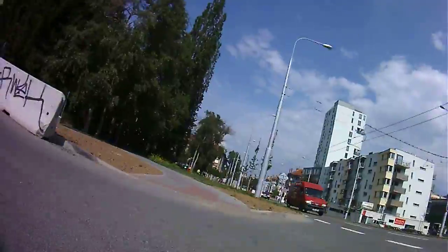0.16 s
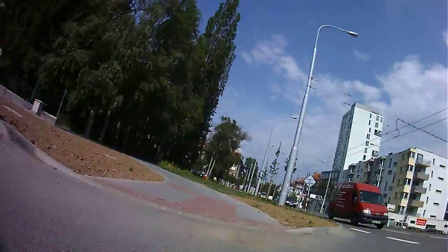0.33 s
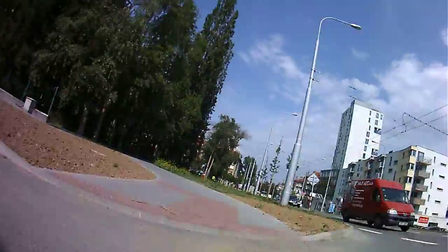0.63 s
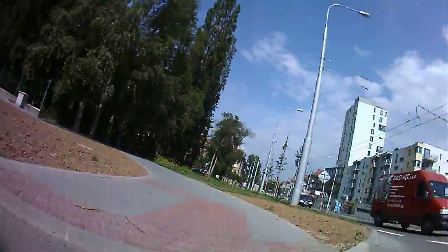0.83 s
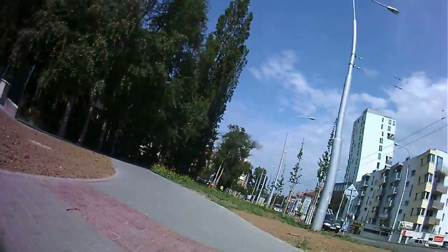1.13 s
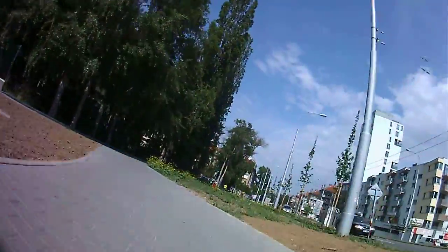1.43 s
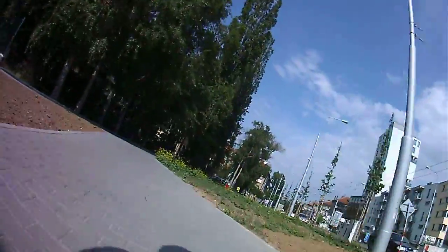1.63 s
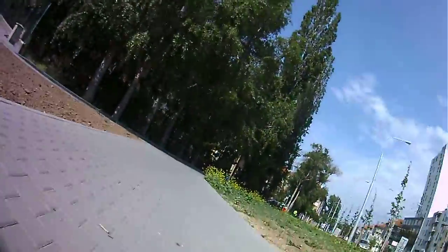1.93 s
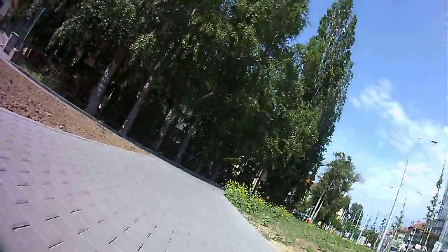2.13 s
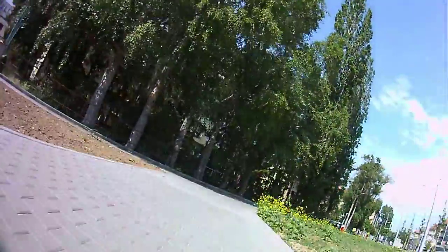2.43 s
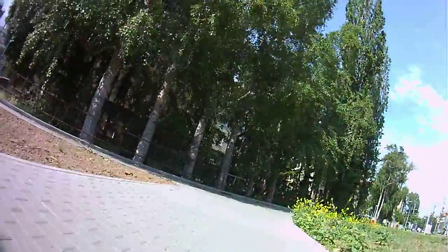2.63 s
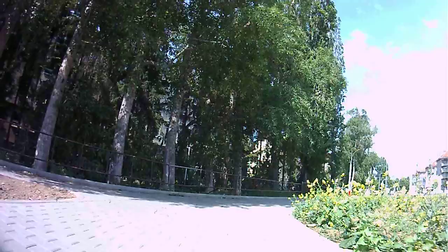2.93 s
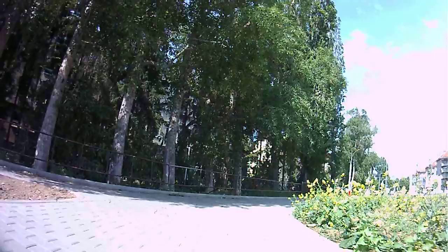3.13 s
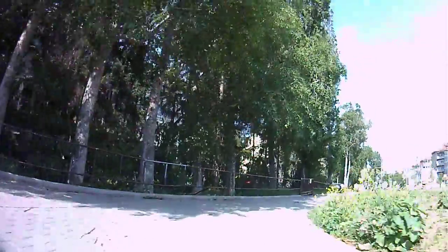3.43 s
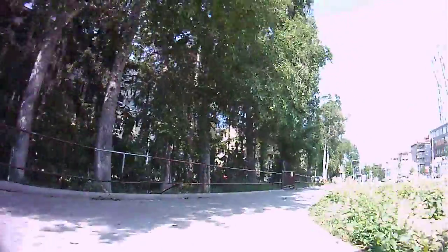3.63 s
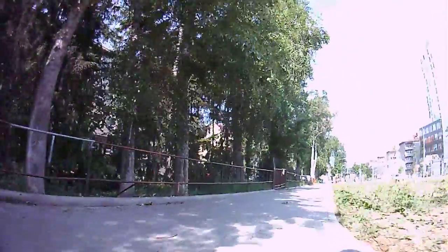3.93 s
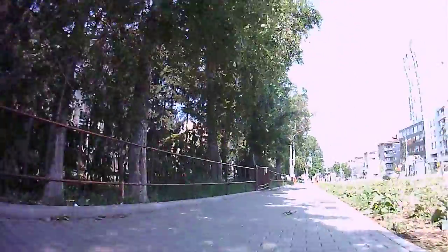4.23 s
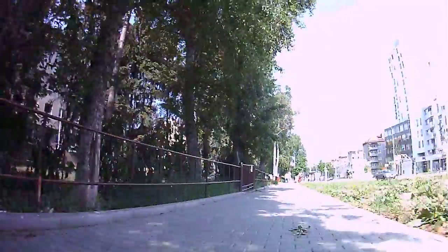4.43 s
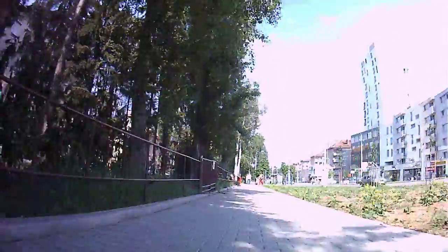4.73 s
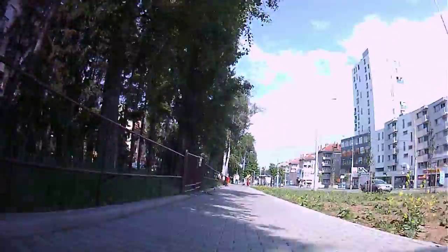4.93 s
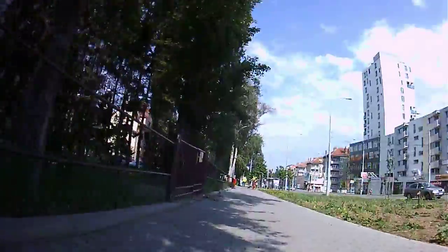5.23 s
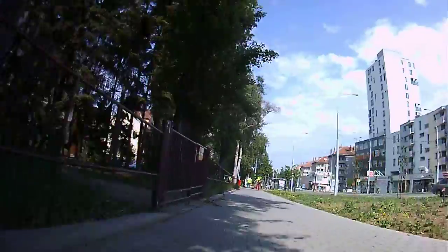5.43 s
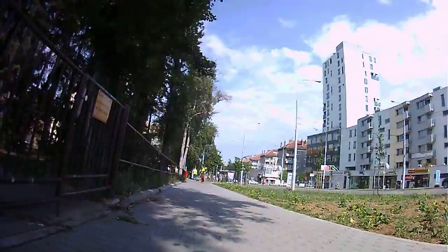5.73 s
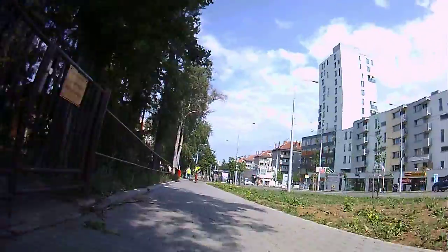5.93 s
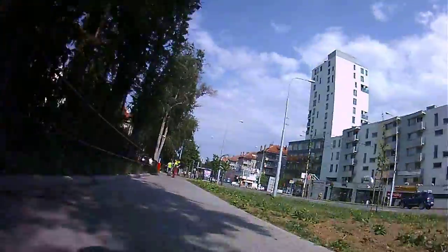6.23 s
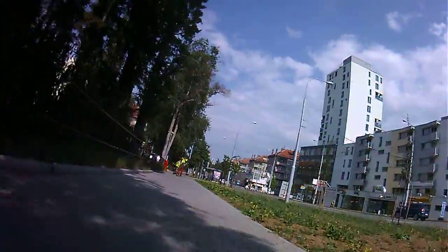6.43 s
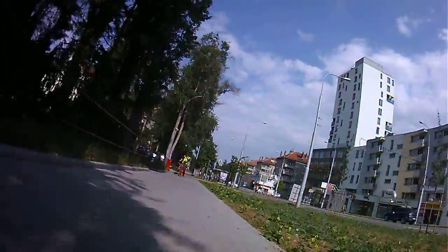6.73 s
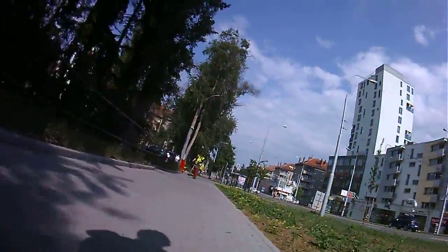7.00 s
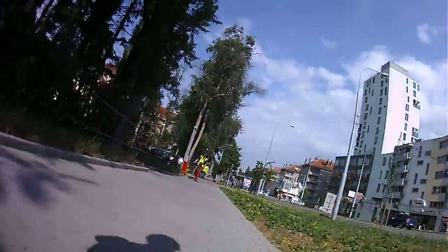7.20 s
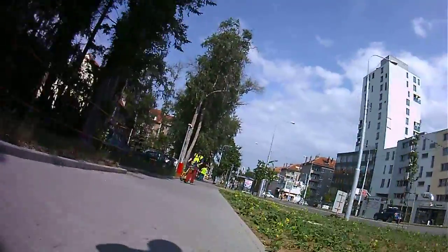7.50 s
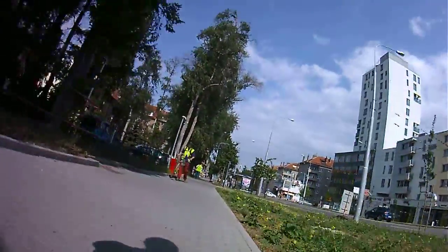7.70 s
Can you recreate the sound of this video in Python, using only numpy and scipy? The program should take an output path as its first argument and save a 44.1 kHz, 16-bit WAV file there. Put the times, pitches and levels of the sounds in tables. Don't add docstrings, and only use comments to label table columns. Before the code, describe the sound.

An electric skateboard rumbles fast over paving blocks, wheels buzzing and drumming, with violent overloaded slams near the start and rattling camera mount throughout.

```python
import sys
import numpy as np
from scipy import signal
from scipy.fft import rfft, irfft, next_fast_len
from scipy.io import wavfile
from scipy.ndimage import map_coordinates

SR = 44100
rng = np.random.default_rng(int(sys.argv[2]) if len(sys.argv) > 2 else 0)


def invert_db(x):
    u = np.asarray(x, float) / 20
    return 10 ** u


def wrap_up_sound(samples):
    columns = np.atleast_2d(samples).T
    tamed = np.clip(columns, -1, 1)
    steps = np.round(tamed * 32767).astype(np.int16)
    wavfile.write(sys.argv[1], SR, steps)


N = 346626


def along(points, hz):
    point_hz, db = np.transpose(points)
    return np.interp(np.log(hz + 1), np.log(point_hz + 1), db)


def curves(rows):
    s, *columns = np.transpose(rows)
    return [np.interp(np.arange(N) / SR, s, column) for column in columns]


def unit(x):
    return x / np.sqrt(np.mean(x ** 2) + 1e-20)


def wobble(rate):
    knots = rng.standard_normal(int(N * rate / SR) + 4)
    return map_coordinates(knots, [np.arange(N) * rate / SR])


def coloured(x, points):
    size = next_fast_len(N + 16384)
    gain = invert_db(along(points, np.fft.rfftfreq(size, 1 / SR)))
    cepstrum = irfft(np.log(gain + 1e-7), size)
    cepstrum[1:size // 2] *= 2
    cepstrum[size // 2 + 1:] = 0
    return irfft(rfft(x, size) * np.exp(rfft(cepstrum)), size)[:N]


def band_noise(hz, octaves, size):
    f = np.fft.rfftfreq(size, 1 / SR) + 1
    bell = np.exp(-(np.log2(f / hz) / octaves) ** 2)
    return unit(irfft(rfft(rng.standard_normal(size)) * bell, size))


def contacts(rows, ring, octaves, rise):
    out, t = np.zeros(N + SR), np.arange(4096) / SR
    for s, db, hz, t60 in rows:
        puff = band_noise(hz, octaves, size=len(t)) * invert_db(-45 * t / t60)
        wave = ring * np.sin(2 * np.pi * hz * t) + puff
        envelope = invert_db(db - 60 * t / t60) * (1 - np.exp(-t / rise))
        out[round(s * SR):][:len(t)] += envelope * wave
    return out[:N]


def ticks(rows, octaves):
    clicks = [(s, db - 1.5, hz, .025) for s, db, hz in rows]
    return contacts(clicks, ring=0.24, octaves=octaves, rise=0.0009)


# start in seconds, peak in dB, pitch in Hz.
GRIT_TICKS = [(0.2354, -54, 2300), (0.3087, -33.5, 2240), (0.5746, -31, 2250), (2.0675, -40, 2390),
              (2.4648, -44, 2380), (2.803, -31, 2180), (3.3653, -39, 3580), (3.5923, -39.5, 3370),
              (3.628, -36.5, 3460), (4.1235, -38.5, 3530), (4.1535, -33.5, 3400), (4.1729, -31.5, 3330),
              (4.2119, -42.5, 3650), (6.2567, -38, 2420), (6.674, -46, 3530), (6.8575, -41, 2920),
              (7.0624, -29, 2200), (7.5844, -37, 2280), (7.6036, -34, 3100), (7.817, -34, 2700)]


def grit_ticks():
    return ticks(GRIT_TICKS, octaves=0.26)


# start in seconds, peak in dB.
HINGE_RATTLES = [(0.434, -18.5), (0.599, -23), (0.6445, -17.5), (0.7272, -15.5), (0.791, -33.5),
                 (1.9358, -19), (1.9842, -26), (2.2396, -33), (2.2785, -22.5), (2.3314, -31), (2.7126, -22),
                 (2.8178, -23.5), (3.0044, -19), (3.0518, -24), (3.0822, -21), (4.3254, -26.5),
                 (4.4775, -18), (4.72, -33.5), (4.8272, -22.5), (4.8672, -25.5), (4.9415, -24),
                 (4.9824, -20.5), (5.39, -22), (5.4399, -26.5), (6.0051, -29), (6.4521, -25),
                 (6.9704, -20.5), (7.0377, -24.5), (7.5471, -22), (7.7421, -34)]
# start in seconds, peak in dB.
CLASP_RATTLES = [(0.0579, -31.5), (2.1385, -22), (2.3486, -25.5), (2.756, -21), (3.1171, -26),
                 (3.2099, -18), (3.3277, -23.5), (3.4145, -25.5), (3.955, -12), (4.0046, -28),
                 (4.0286, -14.5), (4.0779, -25.5), (4.4157, -18), (4.6945, -24), (4.8018, -22.5),
                 (5.0173, -20.5), (5.366, -31), (5.5623, -22), (5.9677, -28.5), (6.0157, -22.5),
                 (6.3523, -16.5), (6.3792, -16.5), (6.7838, -19.5), (6.9265, -18), (7.0707, -17),
                 (7.1041, -31.5), (7.1221, -21.5), (7.145, -26), (7.1694, -29), (7.1919, -19.5)]


def rattles():
    hinge_hz, clasp_hz, case_hz = 1204, 1600, 2263
    pitch_scatter = 0.024
    rings, case = [], []
    for rows, part_hz in ((HINGE_RATTLES, hinge_hz), (CLASP_RATTLES, clasp_hz)):
        for s, db in rows:
            part_detune, case_detune = np.exp(pitch_scatter * rng.standard_normal(2))
            rings.append((s, db, part_hz * part_detune, 0.026))
            case.append((s, db - 11.5, case_hz * case_detune))
    return contacts(rings, ring=1.0, octaves=.35, rise=0.0016) + ticks(case, octaves=.13)


# start in seconds,
# peak in dB, pitch in Hz.
WHEEL_KNOCKS = [(0.13, -18, 427), (0.426, -17, 411), (0.705, -16, 430), (1.034, -15, 410),
                (1.697, -10.5, 380), (2.139, -20, 345), (2.908, -26, 410), (3.65, -20, 420),
                (3.783, -14.5, 375), (4.319, -8, 410), (4.358, -18.5, 135), (4.43, -19.5, 132),
                (4.732, -14.5, 412), (4.938, -28, 393.2), (5.476, -10, 331), (5.613, -13.5, 142.2),
                (5.651, -8, 136.4), (6.171, -20.5, 567), (6.628, -23, 408), (7.035, -8.5, 431),
                (7.316, -27, 450), (7.36, -14, 450), (7.585, -14.5, 423), (7.672, -19, 524)]


def wheel_knocks():
    return contacts([(*row, .06) for row in WHEEL_KNOCKS], ring=1.0, octaves=0.94, rise=0.0025)


# start in seconds,
# peak in dB, thud against it in dB, bright edge against it in dB, length in seconds.
STRIKES = [(1.165, -3.5, 2.5, -11, 0.0029), (1.1679, -9, 10.5, -13, 0.0043),
           (1.282, -16, -5, -40, 0.0056), (1.2943, -17, 12.5, -23.5, 0.0064),
           (1.3045, -16.5, 15, -19.5, 0.0065), (1.312, -12.5, 17, -23, 0.0044),
           (1.3201, -1.5, 2.5, -11, 0.0035), (1.3264, 6, 0.5, -11, 0.0043),
           (1.338, -8.5, 6, -17, 0.0034), (1.346, -21, 13.5, -22, 0.0058),
           (1.694, -9.5, 14, -18, 0.00081), (1.709, -16, 11.5, -13, 0.0061),
           (1.724, -12.5, 7, -10.5, 0.0019), (1.8804, 3.5, 5, -35, 0.0029),
           (1.892, -14.5, 14.5, -17, 0.0054), (1.9058, -15.5, 14.5, -16, 0.004),
           (4.3205, -31.5, 14.5, 1, 0.0062), (5.477, -29.5, 7, -0.5, 0.0044),
           (5.528, -27, 28.5, 5.5, 0.0016), (5.597, -22, 14, -28, 0.011),
           (5.6214, 4.5, -1.5, -13, 0.0035), (5.6442, -3.5, 4.5, -22, 0.0032),
           (5.684, -30.5, 29, 1, 0.0044), (7.0346, -19, 16.5, -5, 0.0035)]
# start in seconds, peak in dB,
# thud against it in dB.
FURTHER_STRIKES = [(1.119, -26.5, 13), (1.138, -31, 6), (1.151, -33.5, 19.5), (1.359, -36, 13),
                   (1.364, -33, 12), (1.728, -27, 26), (1.7354, -26, 10), (1.747, -26, 21),
                   (1.7533, -20.5, 12), (1.872, -28, 25.5), (1.918, -28, 4), (2.24, -30, 22),
                   (2.646, -29.5, 27.5), (3.053, -25.5, 16), (3.786, -27, 19.5), (4.41, -26, 21),
                   (5.4828, -21.5, 15.5), (5.492, -26.5, 1), (5.501, -27, 21), (5.574, -33, 19),
                   (5.588, -19.5, 1), (5.613, -29, 19), (5.635, -23, 0), (5.667, -31.5, 33),
                   (5.791, -31, 27.5), (6.387, -24.5, 17), (6.979, -27.5, 22), (7.56, -27.5, -10),
                   (7.725, -24, 6)]


def mount_strikes():
    shared_edge_db, shared_s = -14, 0.0035
    tail_db, tail_t60 = -21, 0.037
    out, t = np.zeros(N + SR), np.arange(2048) / SR
    further = [(*row, shared_edge_db, shared_s) for row in FURTHER_STRIKES]
    for s, db, thud_db, edge_db, length in [*STRIKES, *further]:
        thud = invert_db(thud_db - 7) * band_noise(310, 1.3, size=len(t))
        core = invert_db(-4.5) * band_noise(1904, .2, size=len(t))
        body = band_noise(1150, 0.83, size=len(t)) + core
        edge = invert_db(edge_db) * band_noise(3450, .3, size=len(t))
        hold = (1 - np.exp(-t / 0.00092)) * np.exp(-(t / length) ** 2)
        chatter = np.abs(band_noise(110, 0.74, size=len(t))) ** 1.7
        tail = invert_db(tail_db - 60 * t / tail_t60) * chatter * (t > length)
        out[round(s * SR):][:len(t)] += invert_db(db - 1.0) * (hold + tail) * (thud + body + edge)
    return out[:N]


# start in seconds, swing of the slow mode,
# swing of the quick mode, both against full scale 1.
DECK_PUSHES = [(1.122, 0.35, -0.01), (1.1447, 0.21, 0.12), (1.1673, -0.38, -0.03), (1.2816, 0.29, 0.04),
               (1.2952, -0.33, 0.23), (1.3279, -0.8, 0.24), (1.3333, 0.63, 0.32), (1.3515, 0.2, -0.2),
               (1.7107, -0.26, 0.03), (1.7234, 0.32, 0.04), (1.7497, 0.19, 0.05), (1.8803, -0.51, 0.21),
               (1.8884, 0.3, 0.2), (1.9057, -0.32, 0.13), (1.9492, 0.17, -0.06), (2.2259, 0.2, 0.06),
               (3.2109, -0.14, 0.02), (5.4921, 0.35, 0.01), (5.5166, 0.28, -0.03), (5.541, 0.18, 0.01),
               (5.5746, -0.21, 0.05), (5.6082, 0.4, -0.07), (5.6317, 0.42, 0.0), (5.6825, -0.22, -0.01),
               (6.3873, -0.22, 0.0), (6.849, 0.13, 0.09), (6.937, -0.19, -0.03), (6.9678, 0.17, 0.05),
               (7.0259, 0.17, 0.05), (7.7034, -0.19, -0.03)]
# pitch in Hz, decay by 60 dB in seconds.
DECK_MODES = [
    (45, .22),
    (125, .05),
]


def deck_bounce():
    s, *swings = np.transpose(DECK_PUSHES)
    t = np.arange(SR // 2) / SR
    pushes = [np.bincount((s * SR).astype(int), swing, N) for swing in swings]
    rings = [np.sin(2 * np.pi * hz * t) * invert_db(-60 * t / t60) for hz, t60 in DECK_MODES]
    return signal.fftconvolve(pushes, rings, axes=1).sum(0)[:N]


# start in seconds, length in seconds, extra roughness in dB.
BROKEN_PAVING = [(0.588, 0.078, 0), (1.238, 0.15, 2), (1.75, 0.12, 1), (1.933, .08, 2.5),
                 (2.115, 0.054, 1.5), (2.279, 0.033, 2), (2.338, 0.02, 3), (2.729, 0.053, 1.5),
                 (2.997, 0.067, 0), (3.774, .14, 2), (4.329, .18, 4.5), (5.489, 0.24, 2.5), (6.152, .11, 3),
                 (6.368, 0.17, 2.5), (6.659, 0.12, 2), (6.913, 0.22, 1)]


def broken_paving():
    t = np.arange(N) / SR

    def step(s):
        return (1 + np.tanh((t - s) / .008)) / 2

    return sum(db * (step(s) - step(s + length)) for s, length, db in BROKEN_PAVING)


def loose_grains(rate, size_db):
    place, chance = rng.random((int(rate * N / SR), 2)).T
    size = invert_db(-size_db * np.log(1 - chance))
    return unit(np.bincount((place * N).astype(int), size, N))


# time in seconds, joints per second,
# thump strength against the stone grain in dB.
BLOCK_JOINTS = [(0, 67.3, 1.5), (.7, 63.6, 1.5), (1.1, 66, 1), (1.55, 64, 0), (2, 61, 0), (2.25, 57.6, 1),
                (3, 56.5, 1), (3.5, 56.4, 1.5), (3.8, 53.7, 0), (4.05, 55.5, 0), (4.6, 59, 1.5),
                (5.03, 62, 1.5), (5.85, 63, 0), (6.3, 69.5, 1), (6.83, 68.6, 1), (7.07, 70.3, 3.5),
                (7.55, 70.3, 4), (7.86, 75, 2.5)]


def joint_thumps(scatter, size_db):
    rate, strength_db = curves(BLOCK_JOINTS)
    count = np.cumsum(rate) / SR
    late, uneven = rng.standard_normal((int(count[-1]), 2)).T
    at = np.interp(np.arange(len(late)) + scatter * late, count, np.arange(N)).astype(int)
    return invert_db(strength_db) * unit(np.bincount(at, invert_db(size_db * uneven), N))


def stir(hits):
    t = np.arange(2000) / .0022 / SR
    shape = t * np.exp(-t)
    return signal.fftconvolve(hits, shape / shape.sum())[:N]


# time in seconds, load in dB.
MOTOR_LOAD = [
    (0.0, -66.5),
    (1.73, -66.5),
    (2.89, -53.5),
    (3.63, -62),
    (5.36, -67.5),
    (5.69, -62.5),
    (5.95, -65),
    (7.86, -67),
]
# frequency in Hz, level in dB.
WHIRR_COLOUR = [(1470, -37.5), (2500, -7.5), (2870, -9), (3040, -1), (3480, 0.5), (3600, 1), (3940, -2),
                (5120, -42), (8670, -120)]


def belt_whirr(joint, crackle, rough_db):
    load_db, = curves(MOTOR_LOAD)
    drive = (3.2 + joint + .4 * crackle) * rng.standard_normal(N)
    whirr = coloured(invert_db(0.98 * wobble(30)) * drive, WHIRR_COLOUR)
    return invert_db(1 + .4 * rough_db + load_db) * unit(whirr)


# frequency in Hz, level in dB.
BUZZ_COLOUR = [(470, -14.5), (800, 3), (935, -6.5), (1080, -6), (1200, 2), (1390, -7.5), (1650, 0),
               (1880, -13), (2310, -21), (2500, -24), (2680, -33.5), (3770, -73), (6380, -120)]


def truck_buzz(kicks, joint, crackle, swell, rough_db, patch_db):
    drive = (2.7 + joint + crackle) * rng.standard_normal(N) + .5 * kicks
    buzz = coloured(invert_db(0.24 * swell + 2.3 * wobble(35)) * drive, BUZZ_COLOUR)
    return invert_db(-39 + 1.8 * rough_db + (0.85 - 1) * patch_db) * unit(buzz)


# frequency in Hz, level in dB.
DRUM_COLOUR = [(47, -59.5), (80, -11.5), (127, -6.5), (267, -10.5), (305, -13), (333, -6), (419, 2),
               (457, -3.5), (570, -5), (933, -22.5), (1100, -24.5), (1430, -45.5), (2420, -120)]


def wheel_drum(kicks, joint, swell, rough_db):
    drive = (.9 + .5 * joint) * rng.standard_normal(N) + 1.15 * kicks
    drum = coloured(invert_db(.9 * swell) * drive, DRUM_COLOUR)
    return invert_db(-28 + 1.26 * rough_db) * unit(drum)


# frequency in Hz, level in dB.
SHAKE_COLOUR = [(12, -33.5), (20, -0.5), (44, 7.5), (67, -5.5), (87, -5.5), (130, -12), (170, -34),
                (290, -120)]


def deck_shake(kicks, rough_db):
    cruise_rate = 61
    skim_db = 0.29 * (curves(BLOCK_JOINTS)[0] - cruise_rate)
    shake = coloured(invert_db(.8 * wobble(9)) * rng.standard_normal(N) + 1.1 * kicks, SHAKE_COLOUR)
    return invert_db(-27.5 + 0.2 * rough_db - skim_db) * unit(shake)


# time in seconds, roughness in dB.
PAVING = [(0.0, -26.5), (1.31, -27.5), (1.64, -29), (2.06, -28), (2.49, -29), (2.8, -28.5), (3.74, -28),
          (4.23, -29.5), (4.46, -28), (4.95, -28.5), (7.49, -27.5), (7.86, -26.5)]


def rolling():
    surface_db, = curves(PAVING)
    patch_db = broken_paving()
    rough_db = surface_db - surface_db.mean() + patch_db
    kicks = joint_thumps(scatter=.04, size_db=1.6)
    joint = 18 * stir(kicks)
    crackle = 11 * stir(loose_grains(rate=110, size_db=5)) * invert_db(0.72 * patch_db)
    swell = wobble(14)
    whirr = belt_whirr(joint, crackle, rough_db)
    buzz = truck_buzz(kicks, joint, crackle, swell, rough_db, patch_db)
    drum = wheel_drum(kicks, joint, swell, rough_db)
    return whirr + buzz + drum + deck_shake(kicks, rough_db)


def scene():
    small_parts = grit_ticks() + rattles() + wheel_knocks()
    return (small_parts + mount_strikes() + deck_bounce() + rolling())[None]


def low_pass(x):
    return signal.sosfilt(signal.butter(12, 15650, fs=SR, output="sos"), x)


# frequency in Hz, level in dB.
CAMERA_BAND = [(1500, 0.5), (2200, -1), (2750, 2), (3700, 1), (4100, -6), (4350, -7), (4650, -55),
               (4800, -120)]


def record(dry):
    saturated = dry / (1 + np.abs(dry / .725) ** 9) ** (1 / 9)
    band_gain = invert_db(along(CAMERA_BAND, np.fft.rfftfreq(N, 1 / SR)))
    narrow = irfft(rfft(saturated) * band_gain, N)
    return low_pass(np.clip(narrow, -.71, .71))


dry = scene()
out = record(dry)
wrap_up_sound(out)
```